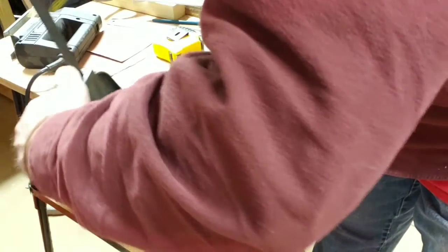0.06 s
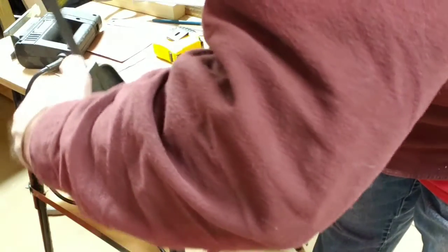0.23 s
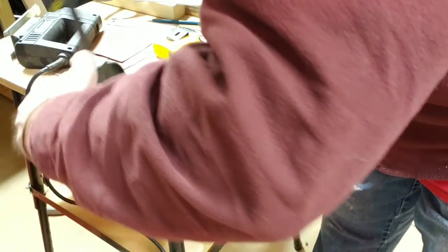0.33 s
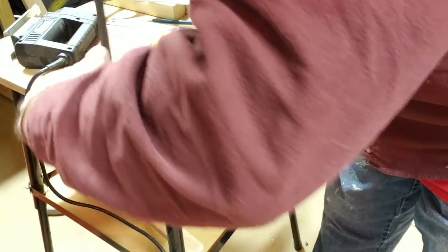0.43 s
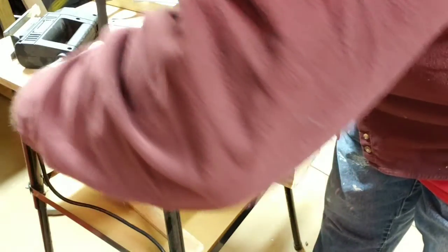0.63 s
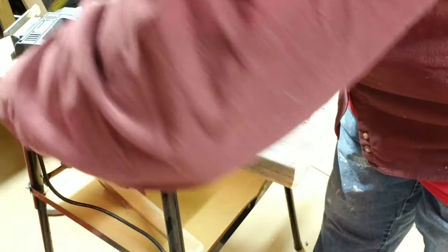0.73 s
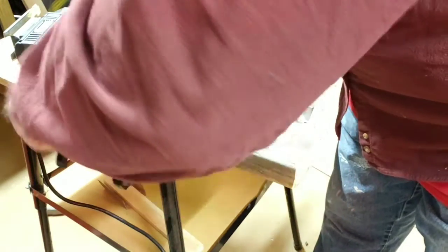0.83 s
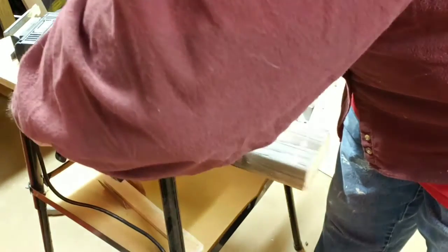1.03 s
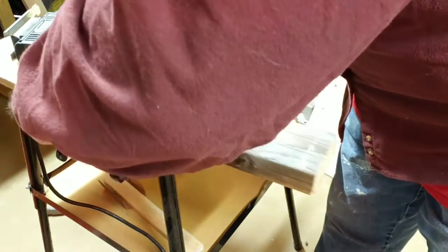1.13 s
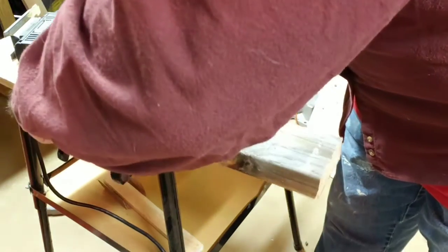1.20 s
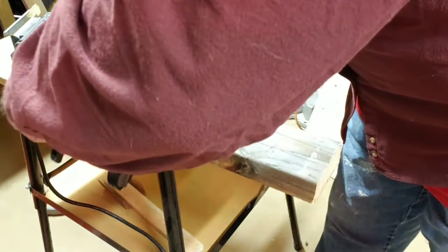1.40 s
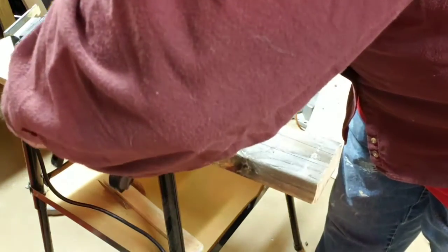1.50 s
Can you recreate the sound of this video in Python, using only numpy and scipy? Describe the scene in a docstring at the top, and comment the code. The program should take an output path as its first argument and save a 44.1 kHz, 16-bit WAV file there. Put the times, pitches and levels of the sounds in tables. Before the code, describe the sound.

A bar clamp clacks sharply on a workbench, with low bench thuds and a board dragging

```python
"""First a low rumble over the whir of a fan far off, then a bump on a workbench in a small hard room.
A bar clamp clacks and squeaks, the bench booms under each bump, and the board drags at the end.
Clamp, bench and board ring as decaying modes or rough tones; the room is noise that dies band by band.
Rubbing, grit and fan are shaped noise; the top is cut at the microphone."""
import sys
import numpy as np
from scipy import signal
from scipy.fft import rfft, irfft
from scipy.io import wavfile

SR = 44100
rng = np.random.default_rng(int(sys.argv[2]) if len(sys.argv) > 2 else 0)


def wrap_up_sound(samples):
    """Save the sound to the file named by the first command line argument, as 16-bit audio."""
    columns = np.atleast_2d(samples).T
    # keep every value between -1 and 1, then stretch to whole-number steps
    tamed = np.clip(columns, -1, 1)
    steps = np.round(tamed * 32767).astype(np.int16)
    wavfile.write(sys.argv[1], SR, steps)


N = 68355

# clacks of the clamp: t/s, level/dB in each of eight bands, direct click/dB against the bands, ring length/s
CLAMP_CLACKS = [(0.184, -62, -57.5, -65, -55, -58, -55, -61, -59, 8, 0.16),
                (0.217, -57, -64, -54, -72, -56, -55.5, -64, -63, 8, 0.032),
                (.258, -43, -46, -46.5, -49, -45, -41.5, -55, -47.5, 31, 0.094),
                (.354, -42.5, -40, -42, -42.5, -51.5, -42.5, -65, -48, 10, 0.097),
                (.359, -69, -69, -46.5, -44, -43.5, -44, -56, -58, 9.4, 0.061),
                (.4915, -53, -46, -48.5, -53, -59, -39, -47, -55, 25, 0.24),
                (0.546, -49.5, -48, -48, -55, -50, -51, -57, -51.5, 9.8, 0.1),
                (0.709, -60.5, -58.5, -75, -76, -62, -65, -73, -65, 24, 0.062),
                (1.076, -92, -70, -73, -74, -76, -79, -75, -59, 15, 0.032),
                (1.115, -83, -77, -59.5, -72, -84, -81, -76, -68, 8, 0.034)]
# edges of those eight bands: f/Hz
BAND_EDGES = [300, 700, 1350, 1900, 2850, 4600, 7400, 8800, 10700]
# modes of the clamp: f/Hz, level/dB before trim and spread, t60/s
CLAMP_MODES = [(566, -18, .2), (924, -11, 0.6), (1237, -5, 0.49), (1562, 0, 0.14), (1587, -7, 0.23),
               (2213, 6, 0.055), (2565, 8, 0.19), (2750, 3, 0.18), (4790, 2, 0.051), (5880, -14, 0.052),
               (6600, 1.5, 0.12)]
CLAMP_TRIM_DB, MODE_SPREAD_DB = -9.5, 3
# decay of the room in each of the eight bands: t60/s
ROOM_T60 = [.34, .34, .34, .32, .27, .25, .25, .24]
ROOM_RISE_S, TREBLE_LATE_S = 0.0023, 0.0017   # time constant of the build-up; extra for the highs
TOP_EDGE_HZ, TOP_DB = 12400, -28              # thin ninth band, level against the eighth
CHOKE_T60_S = 0.12                            # extra decay once the ring length is over

# short knocks, sharp at the front of the clacks, dull from the board:
# t/s, f/Hz, level/dB before swell and decay, cycles per 60 dB of decay
KNOCKS = [(0.26, 1780, -26.5, 7.4), (.2585, 507, -36, 4.1), (.266, 385, -42.5, 55),
          (.3537, 744, -21.5, 5.3), (0.3556, 1500, -24.5, 10.7), (0.3576, 2350, -17.5, 9),
          (0.3615, 1320, -23.5, 10.4), (0.4901, 1260, -28, 7), (0.499, 354, -36, 20),
          (0.5469, 1250, -31, 11.6), (.5478, 2520, -35, 7), (0.554, 9600, -39.5, 66), (.221, 4950, -43, 20),
          (.7112, 726, -34, 4.4), (1.362, 160, -36, 16), (1.397, 163, -32.5, 8.4)]

# rough ring of the steel bar after a clack: t/s, f/Hz, level/dB
BAR_RING = [(.259, 6840, -63), (.27, 6870, -47.5), (.33, 6800, -63), (.36, 6950, -92)]
BAR_ROUGHNESS_HZ = 190

# bumps on the bench: t/s, thud level/dB, higher boom mode/dB and upper modes/dB against it, ring length/s
BENCH_BUMPS = [(0.142, -53.5, -5, -13, 0.044), (0.211, -29.5, -2.5, -21, 0.048),
               (.262, -37.5, 6.5, -1.5, 0.082), (.345, -45, 2.5, -7, 0.107), (.405, -46, -13, -5, 0.02),
               (0.494, -19.5, 1, -18.5, 0.085), (0.677, -58, -7, -28, .04),
               (0.715, -23.5, -2.5, -11.5, 0.062), (0.904, -47, -2.5, -16, 0.016),
               (0.946, -54.5, 7.5, -14, 0.039), (1.131, -41, -17, -48, 0.094), (1.016, -57.5, 4, -4, .04),
               (1.4, -49.5, 7, 0.5, 0.036), (1.453, -37, -1, -18, 0.025), (1.476, -45, 0, -11, .04)]
# low modes of bench and room, the last being the higher boom: f/Hz, relative level/dB, t60/s before rubbing
BOOM_MODES = [(65, -43, 0.46), (89.85, -34, 1), (129.7, -27.5, 0.193)]
# upper modes of bench and room: f/Hz, relative level/dB, t60/s
UPPER_MODES = [(160, 4, 0.16), (191.2, -5, 0.3), (236.2, -4.5, 0.16), (268.4, -6, 0.38), (302, -9.5, 0.23),
               (341.6, -16.5, 0.59), (385, -16, 0.25)]
PUSH_S = 0.006
THUD_HZ, UPPER_HZ = [84, 160], [151, 431]     # pass bands

# rumble of handling and of the board rubbing: t/s, low modes level/dB, upper modes level/dB, before trim
RUB_LEVELS = [(0.0, -54, -75), (0.112, -63, -69), (0.246, -44, -68), (0.366, -59, -43), (0.4, -54, -59),
              (0.656, -48.5, -54.5), (0.828, -53.5, -52.5), (0.948, -55.5, -80), (1.108, -54, -68),
              (1.246, -56.5, -64), (1.406, -51, -51), (1.55, -52, -64.5)]
RUB_TRIM_DB, RUB_LUMPS_DB = -2, 1.5
RUB_DAMPING = 1.67                            # rubbing divides the boom's t60 by this

# groan of the dragged board: t/s, f/Hz, level/dB
BOARD_GROAN = [(1.19, 265, -70), (1.22, 253.5, -61), (1.27, 224.8, -55), (1.33, 172.5, -53),
               (1.375, 160, -51), (1.39, 244, -46), (1.41, 241, -50), (1.46, 255, -54), (1.55, 253, -66.5)]
GROAN_ROUGHNESS_HZ = 22.2
# grit under the dragged board: t/s, level/dB
BOARD_GRIT = [(1.2, -80), (1.3, -66), (1.4, -66), (1.48, -67), (1.55, -78)]
GRIT_HZ = [330, 970]
# faint squeak of the sliding jaw: t/s, f/Hz, level/dB
JAW_SQUEAK = [(.2, 1401, -72), (.212, 1425, -54), (.23, 1693, -57), (.255, 1640, -65), (.26, 1640, -85)]
SQUEAK_ROUGHNESS_HZ = 120
STEADY_SHARE = 0.82                           # steady part of a rough tone, against its noise

# broad colour of the far fan: f/Hz, relative level/dB per Hz
FAN_COLOUR = [(180, -42), (300, 3.5), (334, -15.5), (373, -1.5), (508, -12.5), (557, -8.5), (661, -11),
              (703, -8), (1150, -11), (1370, -7.5), (1500, -7), (1830, -4), (2920, -15), (3800, -6),
              (4790, -14.5), (10200, -13), (12100, -18), (15800, -60), (22000, -120)]
# narrow peaks of its whir: f/Hz, width/Hz, level/dB against the broad colour, before the lift
FAN_WHIR = [(1758, 18, -1.5), (2045, 50, 2), (3783, 16, 1.5), (4406, 115, -4.5), (5620, 146, -2),
            (6800, 9, 5), (7450, 120, -3.5), (8450, 120, -46), (9470, 73, -29), (9993, 290, 0.5)]
FAN_WHIR_LIFT_DB = 9
# the fan as it reaches the microphone: t/s, level/dB of the part above FAN_REFERENCE_HZ
FAN_LEVELS = [(0.0, -59.5), (0.232, -59), (0.4, -56), (0.612, -58), (0.872, -59), (1.55, -56)]
FAN_REFERENCE_HZ = 1500

CUTOFF_HZ = 12400


def clacks():
    """A click and the clamp's modes come direct, then the room's dense reflections decay band by band."""
    out = np.zeros(N)
    t = np.arange(SR // 4) / SR
    click = (np.arange(len(t)) == 0) * 1.
    edges_hz = BAND_EDGES + [TOP_EDGE_HZ]
    for s, *band_dbs, direct_db, length in CLAMP_CLACKS:
        band_dbs = band_dbs + [band_dbs[-1] + TOP_DB]
        spread_db = rng.normal(0, MODE_SPREAD_DB, len(CLAMP_MODES))
        modes = [(hz, db + CLAMP_TRIM_DB + g, t60) for (hz, db, t60), g in zip(CLAMP_MODES, spread_db)]
        noise = rng.standard_normal((2, len(t)))
        struck = amp(direct_db) * click + ring(click, modes)
        clack = 0
        for k, db in enumerate(band_dbs):
            edges = edges_hz[k:k + 2]
            rise = 1 - np.exp(-t / (ROOM_RISE_S + (k > 3) * TREBLE_LATE_S))
            decay = amp(-60 * t / ROOM_T60[min(k, 7)])
            # neighbouring bands take turns with the two noises
            tail = rms_one(band(noise[k % 2], edges, order=3)) * rise * decay
            clack = clack + amp(db) * (tail + band(struck, edges, order=3))
        add(out, s, length, clack)
    return out


def cracks():
    """Short decaying rings of clamp and board that swell over two cycles."""
    out = np.zeros(N)
    for s, hz, db, cycles in KNOCKS:
        turns = np.arange(SR // 5) / SR * hz
        swell = np.sin(np.pi / 4 * np.minimum(turns, 2)) ** 2
        decay = amp(db - 60 * turns / cycles)
        add(out, s, 1, decay * swell * 2 * np.sin(2 * np.pi * turns))
    return out


def bar_ring():
    """The steel bar rings as a rough high tone after a clack."""
    return rough_tone(BAR_RING, BAR_ROUGHNESS_HZ)


def bumps():
    """A soft push gives a short thud that sets the boom going; a rough touch drives the upper modes."""
    out = np.zeros(N)
    t = np.arange(SR // 3) / SR
    push = np.sin(np.pi * np.minimum(t / PUSH_S, 1)) ** 2
    thud = band(push, THUD_HZ, order=3)
    thud /= np.abs(thud).max()
    low = ring(thud, BOOM_MODES[:-1]) / 10
    high = ring(thud, BOOM_MODES[-1:]) / 10
    for s, db, high_db, upper_db, length in BENCH_BUMPS:
        upper = 0
        # own strength and sign for each mode
        for (hz, mode_db, t60), (a, b) in zip(UPPER_MODES, rng.standard_normal((len(UPPER_MODES), 2))):
            upper = upper + np.sign(b) * ring(t == 0, [(hz, mode_db + 2 * a, t60)])
        upper = band(upper, UPPER_HZ, order=2)
        bump = thud + low + amp(high_db) * high + amp(upper_db) * upper
        add(out, s, length, amp(db) * bump)
    return out


def rub():
    """Lumpy friction noise feeds the same modes of bench and room."""
    low_db, upper_db = in_time(RUB_LEVELS)
    white = rng.standard_normal((3, N))
    lumps = amp(RUB_LUMPS_DB * rms_one(lowpass(white[2], 25)))
    damped = [(hz, db, t60 / RUB_DAMPING) for hz, db, t60 in BOOM_MODES]
    low = rms_one(ring(white[0] * lumps, damped))
    upper = rms_one(band(ring(white[1] * lumps, UPPER_MODES), UPPER_HZ, order=1))
    return amp(RUB_TRIM_DB) * (amp(low_db) * low + amp(upper_db) * upper)


def groan():
    """The dragged board groans as a rough tone of gliding pitch."""
    return rough_tone(BOARD_GROAN, GROAN_ROUGHNESS_HZ)


def grit():
    """Grit under the dragged board makes dull, band-limited friction noise."""
    return amp(*in_time(BOARD_GRIT)) * rms_one(band(rng.standard_normal(N), GRIT_HZ, order=2))


def squeak():
    """The sliding jaw squeaks as a faint rough tone of rising pitch."""
    return rough_tone(JAW_SQUEAK, SQUEAK_ROUGHNESS_HZ)


def fan():
    """A far fan: coloured noise with narrow whirring peaks and a slowly moving level."""
    hz = np.maximum(np.fft.rfftfreq(N, 1 / SR), 1)
    f, db = np.transpose(FAN_COLOUR)
    shape = amp(np.interp(np.log(hz), np.log(f), db))
    peak_power = 0
    for centre, width, peak_db in FAN_WHIR:
        resonance = 1 / (1 + (2 * (hz - centre) / width) ** 2)
        peak_power = peak_power + amp(2 * (peak_db + FAN_WHIR_LIFT_DB)) * resonance
    shape *= np.sqrt(1 + peak_power)
    shape /= np.sqrt(np.mean(shape ** 2 * (hz > FAN_REFERENCE_HZ)))
    level_db, = in_time(FAN_LEVELS)
    return amp(level_db) * irfft(rfft(rng.standard_normal(N)) * shape, N)


def rough_tone(rows, roughness_hz):
    """A tone on the rows' pitch and level, roughened by slow noise on both its phases."""
    hz, db = in_time(rows)
    a, b = lowpass(rng.standard_normal((2, N)), roughness_hz)
    phase = 2 * np.pi * np.cumsum(hz) / SR
    tone = (a + STEADY_SHARE * a.std()) * np.cos(phase) + b * np.sin(phase)
    started = np.arange(N) > rows[0][0] * SR
    return amp(db) * started * rms_one(tone)


def ring(x, modes):
    """Parallel two-pole modes; a unit click sets each ringing at its own level."""
    out = 0
    for hz, db, t60 in modes:
        r = amp(-60 / (max(t60, .01) * SR))
        w = 2 * np.pi * hz / SR
        # the tiny offset keeps the filter off denormal numbers
        out = out + amp(db) * signal.lfilter([0, np.sin(w)], [1, -2 * r * np.cos(w), r * r], x + 1e-18)
    return out


def add(out, s, length, x):
    """Lays a sound in at s seconds, choked after its ring length."""
    t = np.arange(len(x)) / SR
    x = x * amp(-60 * np.maximum(t - length, 0) / CHOKE_T60_S)
    i = int(s * SR)
    out[i:i + len(x)] += x[:N - i]


def band(x, edges_hz, order):
    """Butterworth band-pass."""
    return signal.sosfilt(signal.butter(order, edges_hz, "band", fs=SR, output="sos"), x)


def lowpass(x, hz):
    """Second-order Butterworth low-pass."""
    return signal.sosfilt(signal.butter(2, hz, fs=SR, output="sos"), x)


def in_time(rows):
    """Each column after the time, drawn as straight lines over the scene."""
    s, *columns = np.transpose(rows)
    return [np.interp(np.arange(N) / SR, s, c) for c in columns]


def amp(db):
    """Decibels to amplitude."""
    return 10 ** (np.asarray(db) / 20)


def rms_one(x):
    """Scales to an RMS of one."""
    return x / np.sqrt(np.mean(x ** 2) + 1e-20)


def scene():
    """Clamp, bench and dragged board in front, the fan far behind."""
    clamp = clacks() + cracks() + bar_ring() + squeak()
    board = rub() + groan() + grit()
    return (clamp + bumps() + board + fan())[None]


def record(dry):
    """At the microphone the top is cut steeply, 50 dB down from the cutoff up."""
    return signal.sosfilt(signal.cheby2(12, 50, CUTOFF_HZ, fs=SR, output="sos"), dry)


dry = scene()
out = record(dry)
wrap_up_sound(out)
```